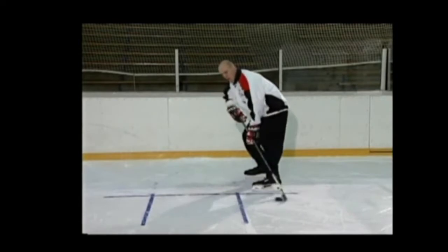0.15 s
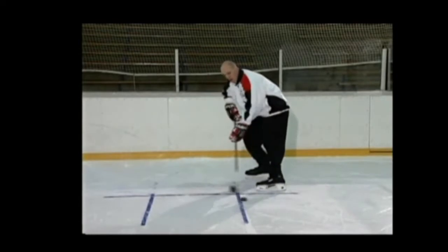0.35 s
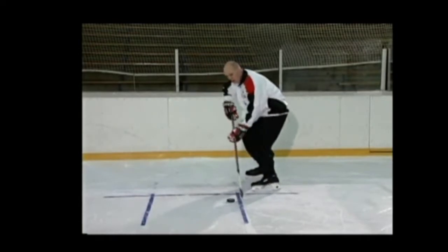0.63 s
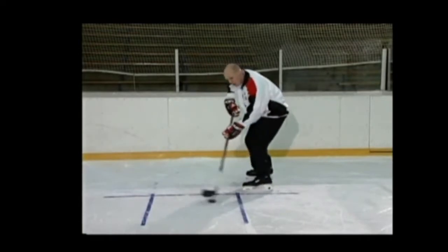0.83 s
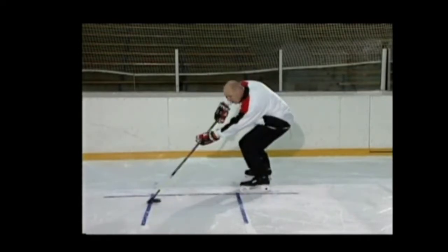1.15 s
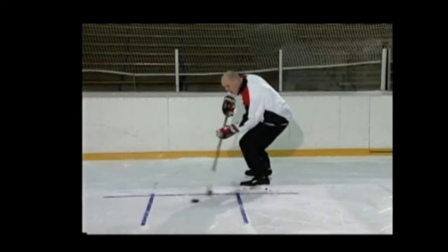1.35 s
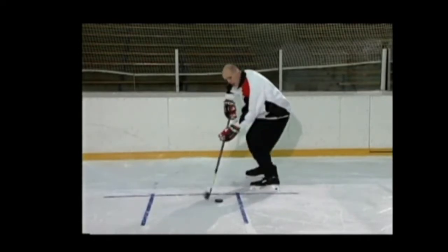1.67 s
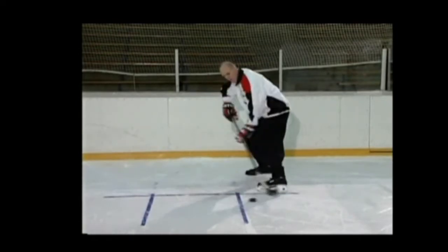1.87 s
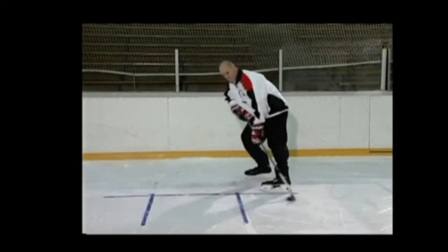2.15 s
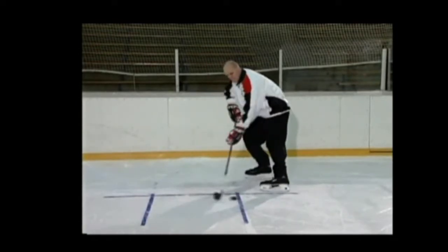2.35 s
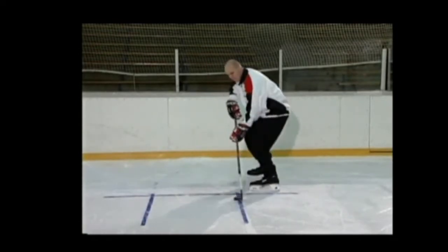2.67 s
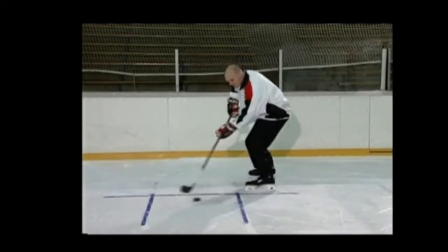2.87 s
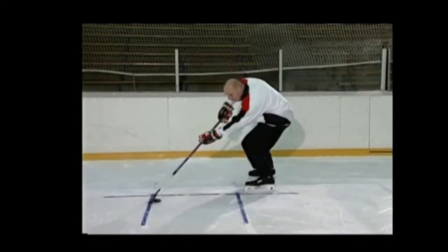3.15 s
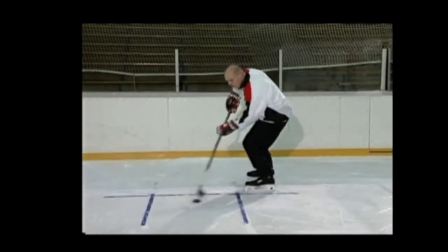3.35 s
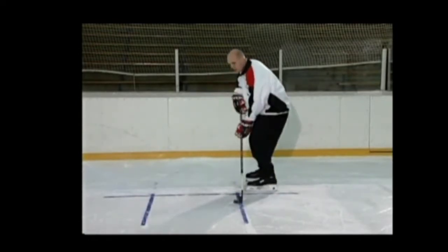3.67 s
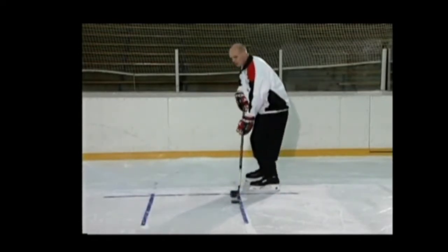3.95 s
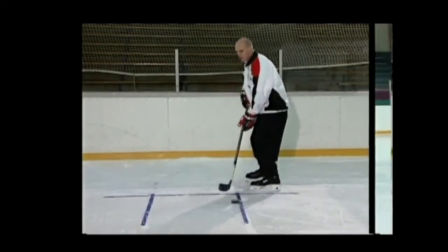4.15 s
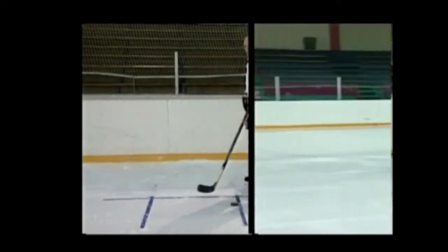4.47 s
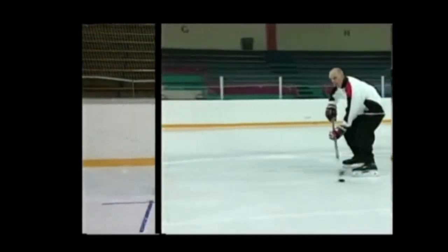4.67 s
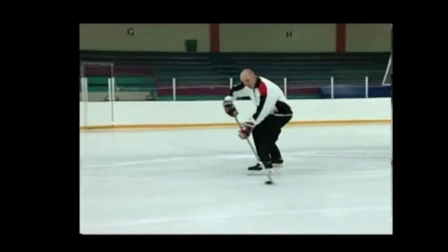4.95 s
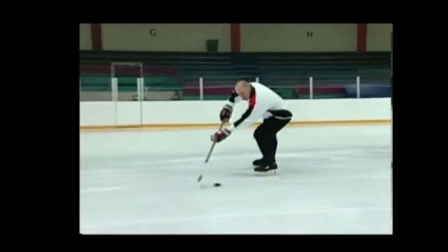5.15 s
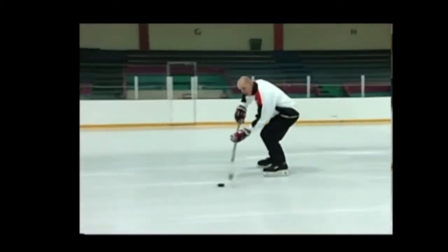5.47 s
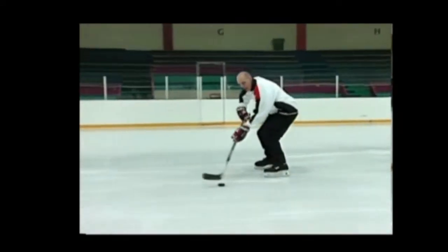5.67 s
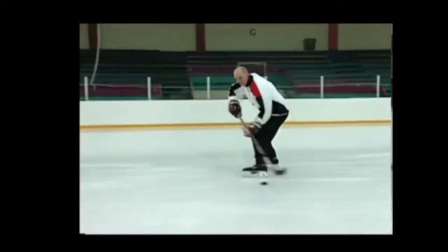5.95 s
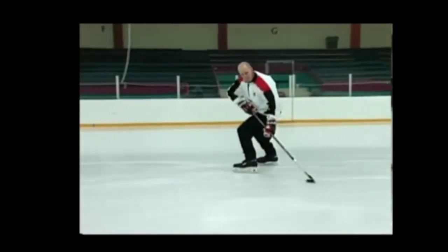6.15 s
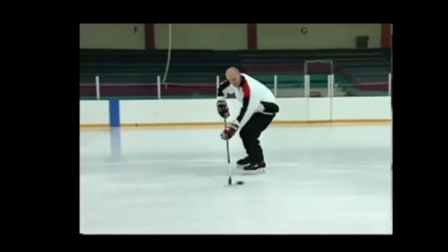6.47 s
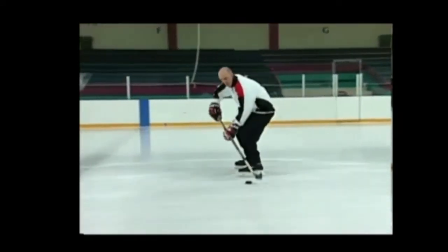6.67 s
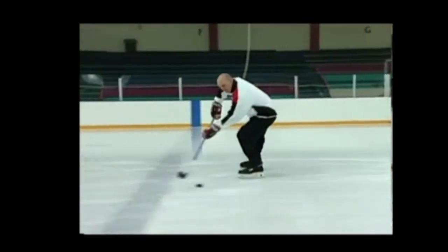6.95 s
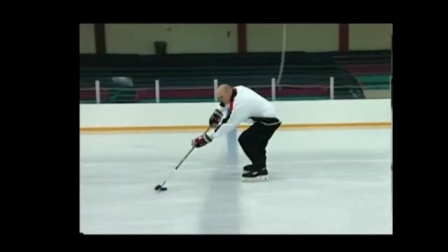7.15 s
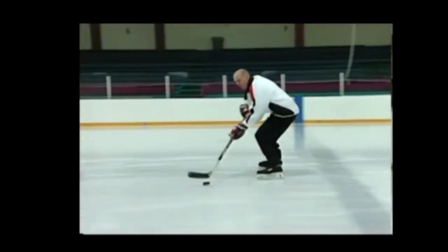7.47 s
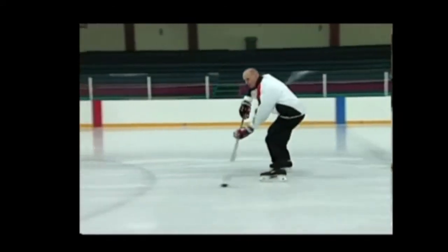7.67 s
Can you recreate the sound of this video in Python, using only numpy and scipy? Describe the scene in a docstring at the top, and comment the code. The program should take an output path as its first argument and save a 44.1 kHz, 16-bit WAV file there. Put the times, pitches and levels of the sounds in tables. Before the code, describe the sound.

Steady stickhandling in an indoor rink: sharp hollow taps a few per second, light blade rebounds, gritty skate glide, and one brief dropout.

```python
"""In an indoor ice rink a skater dribbles a rubber puck from side to side, a few metres from the listener.
Each tap is a noisy contact force exciting the blade's modes, the stick's ring and a falling thump in the ice;
lighter blows follow as the blade drops back. Shaped noise gives the sliding strokes, skates, jacket and air.
A close echo and a faint long tail surround the blows, over steady hum and hiss; once all but that floor drops out."""
import sys
import numpy as np
from scipy import signal
from scipy.fft import rfft, irfft, next_fast_len
from scipy.io import wavfile
from scipy.ndimage import uniform_filter1d, map_coordinates

SR = 44100
rng = np.random.default_rng(int(sys.argv[2]) if len(sys.argv) > 2 else 0)


def bounce(signal):
    """Save signal as a 16-bit WAV file at the path given by the first command-line argument."""
    frames = np.transpose(np.atleast_2d(signal))
    limited = np.clip(frames, -1, 1)
    pcm = np.round(limited * 32767).astype(np.int16)
    wavfile.write(sys.argv[1], SR, pcm)


N = 344862
TIME = np.arange(N) / SR

# All table levels are relative; spectra are densities (dB per Hz) whose noise is then scaled to rms 1.
# Blade on puck: [t/s, level/dB, clack f/Hz, clack prominence/dB, hollow f/Hz, low knock/dB,
#   hardness/dB per octave of treble, chatter/dB, stick ring/dB]
PUCK_TAPS = [(0.0533, -48.5, 1550, 4.5, 2470, 8.5, -2.5, -34, -18),
             (0.2989, -37.5, 1700, 6.5, 2400, 0.5, 1, -16, -10),
             (0.5259, -36.5, 2050, 4, 806, -3.5, 1, 0, -11),
             (0.89, -42.5, 1590, -14.5, 3850, -7, -2, -16, -26),
             (1.3008, -39, 2340, 11.5, 1810, -2.5, -5.0, -20, -19),
             (1.5629, -40.5, 2460, 6, 1470, -1.5, -5, -11.5, -17),
             (1.7746, -40.5, 1790, 10, 796, 1.5, 1.5, -4.5, -19.5),
             (2.2395, -38, 1850, 3.5, 2270, 0, -1.0, -8.5, -10.5),
             (2.4972, -39.5, 2100, 10, 790, -1, 1.5, -11, -23),
             (2.8366, -48, 2550, 4, 4030, 1.5, 5, -18, -10),
             (3.3729, -41.5, 2560, 9.5, 3940, -3, 1, -6, -21),
             (4.0562, -43, 2010, 7.5, 1370, -5.5, -3.5, -29, -13),
             (4.2365, -41.5, 2040, 5, 1330, -4, -5, -18, -4),
             (4.42, -43.5, 3170, 11, 2680, -3, -8.5, -30, -6),
             (4.632, -37.5, 1950, 11.5, 780, -1, 2, -15, -11.5),
             (5.055, -42.5, 1820, 7.5, 3850, 2, 4, -15, -18),
             (5.3512, -37, 2060, 4.5, 1400, -2, 1.5, -21, -6),
             (5.5705, -39.5, 1700, 1.5, 1200, -2.5, -1, -17, -12),
             (5.8727, -34, 2500, 15.5, 1240, -2.5, 1, -8, -17.5),
             (6.293, -37, 2110, 16.5, 4060, 1.5, 4, -32, -18),
             (6.535, -33.5, 2000, 12, 810, 0.5, 1, -9, -15),
             (6.9015, -40.5, 1960, 6.5, 4030, 0.0, 1, 3, -21),
             (7.2056, -34.5, 1950, 7.5, 1470, -6.5, 0, -12, -5.5),
             (7.4137, -38, 1890, 9.5, 5250, 5, 6.5, -6, -14),
             (7.6406, -35, 2170, 13.5, 1180, -8.5, -2.5, -18, -13.5)]
# Blade dropping back on the ice: [t/s, level/dB, clack f/Hz, clack prominence/dB, hardness/dB per octave]
BLADE_REBOUNDS = [(.3246, -51, 2400, 0, -4), (0.5926, -54, 2020, 10.5, -8), (0.96, -64.5, 1900, 3, -2),
                  (1.354, -51.5, 1940, 5, -4), (1.588, -56.5, 2300, 3, -2.5), (2.29, -52.5, 1950, 6, -0.5),
                  (2.5416, -56, 2150, 12, -4.5), (2.9082, -66, 1950, 1, -1), (4.07, -52.5, 2400, 4, -9),
                  (4.4595, -59.5, 3000, 11, -6), (4.693, -61.5, 1950, 0, -11), (5.102, -51, 2370, 3, 2),
                  (5.3867, -48, 2270, 13, -1), (5.9575, -49, 1896, 6, -5), (6.0798, -55, 2210, 6.5, 5.5),
                  (6.3376, -47, 1910, 10, 4), (6.578, -52.5, 2530, 13, 1.5), (6.9594, -52, 1950, 3, 3),
                  (7.239, -45, 2040, 11, 4)]
# Bending modes of the stick: [nominal f/Hz, t60/s]
STICK_MODES = [(952, 0.069), (1912, 0.033)]
# Broad resonances of the blade and the valleys between them: [f/Hz, level/dB]
BLADE_RESONANCES = [(60, -33), (200, -9), (330, -11.5), (430, -3.5), (500, -5), (630, 0), (1100, -3.5),
                    (1270, 1.5), (1620, -5), (1950, -4.5), (2450, -7.5), (2800, -10), (3100, -8),
                    (3550, -11), (4050, -9.5), (4500, -15), (6200, -22), (9000, -31), (13000, -40)]
# Ice chips under blade and skates: [t/s, peak level/dB, f/Hz]
ICE_CHIPS = [(4.034, -42, 3700), (4.54, -45, 3500), (4.761, -46, 7100), (5.479, -55, 6500),
             (6.126, -42.5, 6230), (6.449, -43.5, 3600), (6.634, -39.5, 3000), (6.692, -41.5, 5600),
             (6.809, -44, 2840), (7.359, -39, 3400)]
# Strokes of blade and puck over the ice: [start t/s, length/s, gliding level/dB, scraping level/dB]
SLIDING_STROKES = [(0, 0.029, -58.5, -68), (0.162, .19, -64, -68.5), (0.42, 0.18, -65, -90),
                   (0.615, 0.31, -65, -67.5), (0.981, .17, -66.5, -69), (1.156, .19, -69.5, -76.5),
                   (1.426, 0.17, -69, -74), (1.665, 0.54, -65, -69.5), (2.188, 0.11, -62, -66.5),
                   (2.34, 0.19, -64.5, -72.5), (2.576, 0.15, -64, -72), (2.754, 0.11, -67, -67),
                   (3.01, 0.15, -68.5, -67), (3.17, 0.21, -74, -77), (3.54, 0.41, -68, -77.5),
                   (3.753, 0.099, -62.5, -62.5), (3.883, 0.16, -64, -66.5), (4.128, .11, -63, -72),
                   (4.31, 0.095, -61.5, -69.5), (4.496, 0.38, -64, -69.5), (4.79, 0.26, -65.5, -66.5),
                   (5.19, 0.13, -62.5, -67.5), (5.47, .15, -64, -77), (5.685, 0.25, -64, -67.5),
                   (5.957, 0.12, -58, -59.5), (6.097, 0.18, -58.5, -64), (6.418, 0.3, -61.5, -64.5),
                   (6.724, 0.16, -58, -62), (7.044, .19, -60, -61), (7.311, 0.15, -61.5, -62.5),
                   (7.49, 0.24, -64.5, -67.5), (7.723, 0.11, -62.5, -64.5)]
# How hard the skates run on the ice: [t/s, level/dB]
SKATE_EFFORT = [(0, -73.5), (1.2, -79.5), (1.5, -80.5), (2.3, -78.5), (3.0, -75), (3.3, -75), (3.72, -84),
                (3.81, -72), (4.7, -74.5), (4.95, -67), (5.15, -73.5), (5.65, -69.5), (6.25, -69),
                (6.5, -72), (6.85, -68.5), (7.05, -69), (7.35, -69.5), (7.55, -76)]
# Spectrum of gliding: [f/Hz, level/dB]
GLIDE_SPECTRUM = [(120, -32.5), (260, -10), (430, 2), (650, 1), (1000, -1), (1280, 1.5), (1600, -1.5),
                  (2000, -3), (2500, -6.5), (3100, -12.5), (4500, -44)]
# Spectrum of scraping: [f/Hz, level/dB]
SCRAPE_SPECTRUM = [(1500, -15), (2700, 4.5), (3300, 6), (3900, 5.5), (4500, 2), (5000, 2.5), (6500, -4),
                   (12000, -35)]
# Arm swings that rustle the jacket: [fastest moment t/s, build-up/s, level/dB]
ARM_SWINGS = [(.04, 0.031, -71), (.3, 0.081, -65), (.45, 0.076, -75), (.85, 0.13, -70.5),
              (1.19, 0.12, -68.5), (1.35, 0.016, -72), (1.54, 0.058, -73.5), (1.87, 0.2, -73),
              (2.25, 0.075, -70), (2.39, 0.1, -74), (2.8, 0.16, -72), (3.25, 0.16, -68.5),
              (3.87, 0.08, -79.5), (4.03, 0.075, -73.5), (4.36, 0.088, -84), (4.58, 0.066, -81),
              (4.78, 0.044, -77), (4.97, 0.12, -67), (5.28, 0.13, -75.5), (5.55, 0.057, -78),
              (5.72, 0.1, -75), (5.85, 0.08, -70.5), (6.05, 0.063, -65), (6.25, 0.056, -72.5),
              (6.52, 0.12, -80), (6.64, 0.046, -77), (6.84, 0.1, -69), (7.18, 0.15, -72.5),
              (7.39, 0.086, -72), (7.61, 0.14, -73), (7.81, 0.11, -74)]
# Spectrum of rustling cloth: [f/Hz, level/dB]
SWISH_SPECTRUM = [(3500, -4), (5500, 6), (7500, 10), (10000, 9), (12000, 6.5), (13000, -20.5)]
# Skates shifting their weight onto the ice: [t/s, peak level/dB]
SKATE_STEPS = [(2.423, -65), (2.704, -62), (3.894, -62), (4.911, -58), (5.485, -63), (5.753, -64),
               (6.014, -53), (6.186, -57), (6.813, -59)]
# Puffs of air on the microphone: [strongest moment t/s, build-up/s, level/dB]
AIR_PUFFS = [(.33, .08, -64.5), (2.68, 0.21, -69), (3.27, 0.077, -61), (5.52, .08, -65), (6.03, .07, -68),
             (6.34, .04, -65), (6.6, 0.073, -66), (7.19, .08, -59), (7.45, .1, -63.5)]
# Spectrum of moving air: [f/Hz, level/dB]
AIR_SPECTRUM = [(15, -35.5), (32, -11.5), (45, -2), (60, -6), (100, -18.5), (250, -51)]
# Spectrum of the skater's weight rolling over the ice: [f/Hz, level/dB]
ROLLING_SPECTRUM = [(50, -19.5), (100, -1.5), (180, 2.5), (280, 0), (500, -29)]
# Decay of the hall: [f/Hz, t60/s]
HALL_DECAY = [(150, 3.6), (1000, 1.5), (2500, 2), (6000, 1.6), (12000, 0.89)]
# Spectrum of the steady hum and hiss: [f/Hz, level/dB]
FLOOR_SPECTRUM = [(15, -44), (25, 2), (90, -20.5), (123, -7), (148, -32.5), (183, -18), (237, -23),
                  (901, -34.5), (13000, -39.5)]
# The dropout: [fade-out starts t/s, fade-in starts t/s]
SILENCE = (1.88, 2.186)

CONTACT_RISE_S, SNAP_AT_S = .0005, .0014  # rubber squeezes before it pushes back; moment of the hardest push
CLACK_WIDTH_HZ = 330
HOLLOW_DB, HOLLOW_WIDTH = 7.5, 0.13  # modes with a node under the puck: dip, and width as a share of f
KNOCK_BELOW_HZ = 1260  # a flat, full blade adds body below this, fully so an octave down
TREBLE_FROM_HZ, TREBLE_OCTAVES = 1410, 1.17  # the range over which hardness tilts the treble
REBOUND_HOLLOW_HZ, REBOUND_KNOCK_DB = 2760, 2
REBOUND_CHATTER_DB, REBOUND_RING_DB = -14, -19.5
CHIP_BLOW_S = .0011  # a chip breaks off faster than a blade strikes
STROKE_RISE_S, STROKE_COAST_S = 0.052, 0.038  # the blade gathers speed; the puck coasts on
SWELL_STOP = 0.61  # dying-away time of a swing or puff, over its build-up
BOARDS_UNTIL_S = 3.7  # the skater is close to hard surfaces until then
BOARDS_DELAY_S, BOARDS_GAIN = .00314, .3
CUT_S, RETURN_S = 0.0093, 0.026  # the sound goes at once and fades back in
FLOOR_DB = -78
TOP_HZ = 12600


def taps(tap_db=0, rebound_db=1.0):
    """Impact: the blade strikes the puck, and often drops back lightly on the ice."""
    track = np.zeros(N)
    for s, db, *blow in PUCK_TAPS:
        add(track, s, amp(db + tap_db) * contact(*blow))
    for s, db, clack_hz, clack_db, hardness_db in BLADE_REBOUNDS:
        drop = contact(clack_hz, clack_db, REBOUND_HOLLOW_HZ, REBOUND_KNOCK_DB, hardness_db,
                       REBOUND_CHATTER_DB, REBOUND_RING_DB)
        add(track, s, amp(db + rebound_db) * drop)
    return track


def contact(clack_hz, clack_db, hollow_hz, knock_db, hardness_db, chatter_db, ring_db,
            thump_db=-21, high_mode_db=-2, coupling=0.88):
    """Modal excitation: the place struck weights the modes of blade and stick; hardness sets the treble."""
    t = np.arange(8192) / SR
    hz = np.geomspace(60, 13000, 300)

    def place(f):
        peak = clack_db * np.exp(-((f - clack_hz) / CLACK_WIDTH_HZ) ** 2)
        dip = HOLLOW_DB * np.exp(-((f / hollow_hz - 1) / HOLLOW_WIDTH) ** 2)
        return peak - dip

    body = knock_db * np.clip(np.log2(KNOCK_BELOW_HZ / hz), 0, 1)
    treble = hardness_db * np.clip(np.log2(hz / TREBLE_FROM_HZ), 0, TREBLE_OCTAVES)
    colour_db = along(BLADE_RESONANCES, hz) + place(hz) + body + treble
    blade = clack(t, np.c_[hz, colour_db], chatter_db)
    for (f, t60), mode_db in zip(STICK_MODES, (0, high_mode_db)):
        blade = blade + amp(ring_db + mode_db + coupling * place(f)) * ring(t, f, t60)
    # refer the energy of the whole blow to its first 30 ms
    window = np.sqrt(.03 * SR / len(t))
    return window * (unit(blade) + amp(thump_db) * thump(t))


def clack(t, colour, chatter_db, blow=0.0022, settle=0.0085, snap_db=-4, clatter_db=3):
    """Forced response: a hard snap and a chattering tail pass through dense, damped modes."""
    # the tail is a run of uneven recontacts, a few milliseconds each
    clatter = amp(clatter_db * map_coordinates(rng.standard_normal(100), [t * 400]))
    onset = (1 - np.exp(-t / CONTACT_RISE_S)) ** 2
    chatter = amp(chatter_db) * clatter * np.exp(-t / settle)
    push = onset * (np.exp(-t / blow) + chatter)
    snap = (np.arange(len(t)) == round(SNAP_AT_S * SR)).astype(float)
    force = unit(push * rng.standard_normal(len(t))) + amp(snap_db) * unit(snap)
    z = rfft(force)
    # chance sets the fine peaks, the blade sets the broad colour
    broad = np.sqrt(np.abs(uniform_filter1d(np.abs(z) ** 2, size=150)) + 1e-12)
    gain = amp(along(colour, np.fft.rfftfreq(len(t), 1 / SR)))
    return unit(irfft(z * causal(gain / broad)))


def ring(t, hz, t60, rise=0.00039):
    """Damped oscillation: a stick mode decays; its pitch varies a little at random from blow to blow."""
    varied_hz = hz * (1 + 0.0036 * rng.standard_normal())
    phase = 2 * np.pi * (varied_hz * t + rng.random())
    return unit(np.sin(phase) * amp(-60 * t / t60) * (1 - np.exp(-t / rise)))


def thump(t, sweep_hz=230, end_hz=43, fall=0.0047, life=0.026):
    """Dispersion: short bending waves in the ice arrive first, so the pitch falls by the sweep."""
    hz = end_hz + sweep_hz * np.exp(-t / fall)
    return unit(np.sin(2 * np.pi * np.cumsum(hz) / SR) * np.exp(-t / life))


def chips(chip_db=-1):
    """Brittle fracture: small, bright ticks as an edge breaks the ice."""
    track, t = np.zeros(N), np.arange(2048) / SR
    for s, db, hz in ICE_CHIPS:
        colour = [(hz / 8, -24), (hz / 2, -8), (hz, 0), (2 * hz, -16)]
        tick = clack(t, colour, chatter_db=-34, blow=CHIP_BLOW_S)
        add(track, s, amp(db + chip_db) * tick / np.abs(tick).max())
    return track


def sliding(glide_db=0, scrape_db=-3.5, stick_db=4, width_hz=60, skate_glide_db=5, skate_scrape_db=-3):
    """Friction: blade and puck rub over rough ice in strokes; the skates rub faintly all the time."""
    glide, scrape = strokes()
    skates, = curves(SKATE_EFFORT)
    grit = unit(amp(1.77 * wobble(260)))  # bumps in the ice

    def stick(f):
        """Resonance: the rubbing sings faintly in the stick's modes."""
        return amp(stick_db * sum(1 / (1 + ((f - hz) / width_hz) ** 2) for hz, _ in STICK_MODES))

    glide_gain = np.hypot(amp(glide_db) * glide, amp(skates + skate_glide_db))
    scrape_gain = np.hypot(amp(scrape_db) * scrape, amp(skates + skate_scrape_db))
    gliding = unit(filtered(rush(GLIDE_SPECTRUM, side_db=-54.5, patchy_db=2), stick))
    scraping = rush(SCRAPE_SPECTRUM, side_db=-27, patchy_db=3.0)
    return grit * (glide_gain * gliding + scrape_gain * scraping)


def strokes():
    """Kinematics of rubbing: the gains of gliding and scraping follow speed as it rises, holds and coasts."""
    power = np.zeros((2, N))
    for s, length, *dbs in SLIDING_STROKES:
        t = np.arange(round((length + 10 * STROKE_COAST_S) * SR)) / SR
        speed = np.minimum(t / STROKE_RISE_S, 1) * np.exp(-np.maximum(t - length, 0) / STROKE_COAST_S)
        for track, db in zip(power, dbs):
            add(track, s, (amp(db) * speed) ** 2)
    return np.sqrt(power)


def jacket(swish_db=1, rest_db=-88):
    """Friction of cloth: noise swells with each swing of the arms and never quite rests."""
    gain = np.hypot(amp(swish_db) * swells(ARM_SWINGS), amp(rest_db))
    return gain * rush(SWISH_SPECTRUM, side_db=-12.5, patchy_db=4.0)


def steps(step_db=0):
    """Plate bending: a loaded skate bends the ice and sends a soft, falling thud."""
    track, t = np.zeros(N), np.arange(8192) / SR
    for s, db in SKATE_STEPS:
        thud = thump(t, sweep_hz=260, end_hz=58.5, fall=0.0121, life=0.022) * (1 - np.exp(-t / 0.0013))
        add(track, s, amp(db + step_db) * thud / np.abs(thud).max())
    return track


def rumble(puff_db=0, swing_air_db=-1, draught_db=-79, skate_db=-1):
    """Low-frequency flow and load: swings and puffs push the air; the skater's weight rolls over the ice."""
    skates, = curves(SKATE_EFFORT)
    puffs = amp(puff_db) * swells(AIR_PUFFS)
    swings = amp(swing_air_db) * swells(ARM_SWINGS)
    air_gain = np.sqrt(puffs ** 2 + swings ** 2 + amp(draught_db) ** 2)
    air = air_gain * rush(AIR_SPECTRUM, side_db=-12, patchy_db=3.0)
    return air + amp(skates + skate_db) * rush(ROLLING_SPECTRUM, side_db=-13.5, patchy_db=3.0)


def near_echo(x):
    """Comb interference: a close surface answers within milliseconds."""
    near = BOARDS_GAIN * np.clip((BOARDS_UNTIL_S - TIME) * 10, 0, 1)
    echo = filtered(x, lambda hz: np.exp(-2j * np.pi * hz * BOARDS_DELAY_S))
    return (x + near * echo) / np.sqrt(1 + near ** 2)


def hall(x):
    """Reverberation: the distant walls return a faint, long tail whose decay depends on frequency."""
    hz, t, z = signal.stft(rng.standard_normal((2, SR)), SR, nperseg=256)
    decay = amp(-60 * t / along(HALL_DECAY, hz)[:, None])
    build_up = 1 - np.exp(-t / 0.034)
    tail = signal.istft(z * decay * build_up, SR, nperseg=256)[1]
    mid, side = signal.fftconvolve(x[None], tail / np.linalg.norm(tail[0]), axes=1)[:, :N]
    return amp(-26) * np.array([mid + side / 4, mid - side / 4])


def steady_floor():
    """Stationary noise: the hum and hiss keep a constant level."""
    return amp(FLOOR_DB) * rush(FLOOR_SPECTRUM, side_db=-0.5, patchy_db=-2.5)


def rush(spectrum, side_db, patchy_db):
    """Filtered noise: a stereo pair of rms 1 with random gain patches in time and frequency."""
    z = signal.stft(rng.standard_normal((2, N)), nperseg=512)[2]
    field = uniform_filter1d(rng.standard_normal(z.shape[1:]), size=4, axis=0)
    field = uniform_filter1d(field, size=10, axis=1)
    pair = signal.istft(z * amp(patchy_db * unit(field)), nperseg=512)[1][:, :N]
    mid, side = filtered(pair, lambda hz: amp(along(spectrum, hz)))
    return unit(np.array([mid + amp(side_db) * side, mid - amp(side_db) * side]))


def swells(rows):
    """Power addition: bell-shaped gains build up to a peak and stop a little faster."""
    power = np.zeros(N)
    for s, build, db in rows:
        width = np.where(TIME < s, build, build * SWELL_STOP)
        power += amp(2 * db) * np.exp(-2 * ((TIME - s) / width) ** 2)
    return np.sqrt(power)


def amp(db):
    """Logarithmic level: decibels to gain."""
    return 10 ** (np.asarray(db) / 20)


def unit(x):
    """Normalisation: scale to rms 1."""
    return x / np.sqrt(np.mean(x ** 2) + 1e-20)


def along(points, hz):
    """Interpolation: read (f/Hz, value) points on a logarithmic frequency axis."""
    f, v = np.transpose(points)
    return np.interp(np.log(hz + 1), np.log(f + 1), v)


def curves(rows):
    """Interpolation: one value per sample for each column after the time."""
    s, *cols = np.transpose(rows)
    return [np.interp(TIME, s, c) for c in cols]


def wobble(rate):
    """Random modulation: a smooth curve through rate knots a second."""
    return map_coordinates(rng.standard_normal(int(N * rate / SR) + 4), [TIME * rate])


def filtered(x, response):
    """Linear filtering: multiply the spectrum of x by a response of frequency."""
    m = next_fast_len(N + SR // 2)
    return irfft(rfft(x, m) * response(np.fft.rfftfreq(m, 1 / SR)), m)[..., :N]


def causal(gain):
    """Causality: fold the cepstrum to get the minimum-phase response that has this gain."""
    c = irfft(np.log(np.maximum(gain, 1e-6)))
    half = len(c) // 2
    return np.exp(rfft(np.r_[c[0], 2 * c[1:half], np.zeros(half)]))


def add(track, s, sound):
    """Superposition: mix a sound into a track at time s."""
    part = track[max(round(s * SR), 0):][:len(sound)]
    part += sound[:len(part)]


def scene():
    """Superposition: all sources, louder on the left and slightly earlier on the right, over a steady floor."""
    hits = taps() + chips()
    direct = near_echo(hits + sliding() + jacket())
    rink = (direct + hall(hits) + steps() + rumble()) * amp([[.85], [-.85]])
    delay = np.array([[.47], [-.47]]) / SR  # left, right (s)
    rink = filtered(rink, lambda hz: np.exp(-2j * np.pi * hz * delay))
    cut, back = SILENCE
    heard = np.interp(TIME, [cut, cut + CUT_S, back, back + RETURN_S], [1, 0, 0, 1]) ** 2
    return heard * rink + steady_floor()


def record(dry):
    """Band limitation: a very steep low-pass removes what lies above the top frequency."""
    return filtered(dry, lambda hz: 1 / np.sqrt(1 + (hz / TOP_HZ) ** 120))


dry = scene()
out = record(dry)
bounce(out)
```